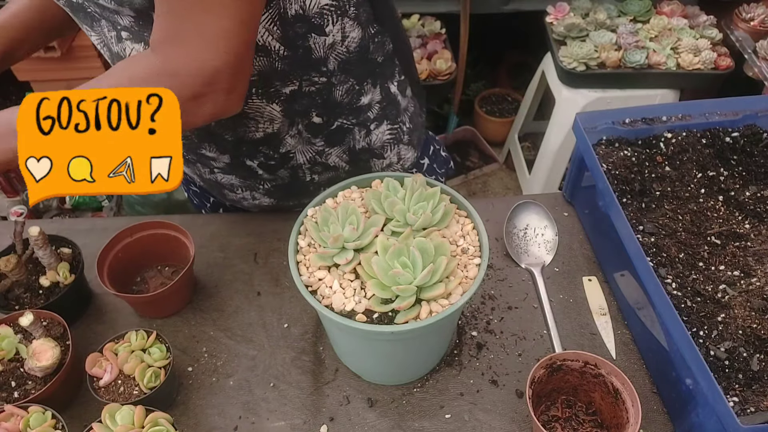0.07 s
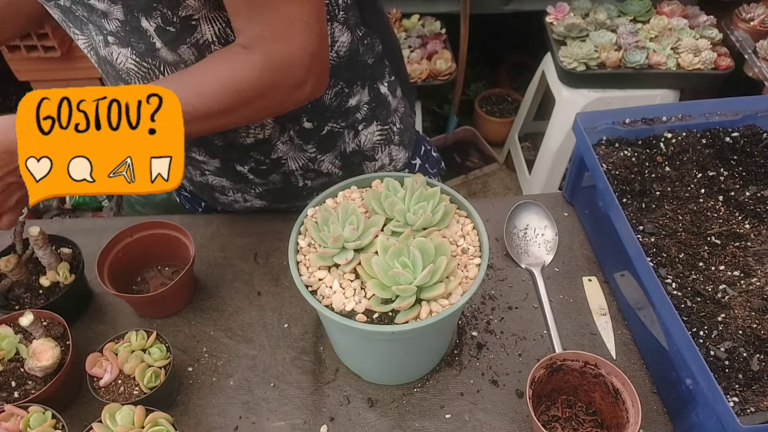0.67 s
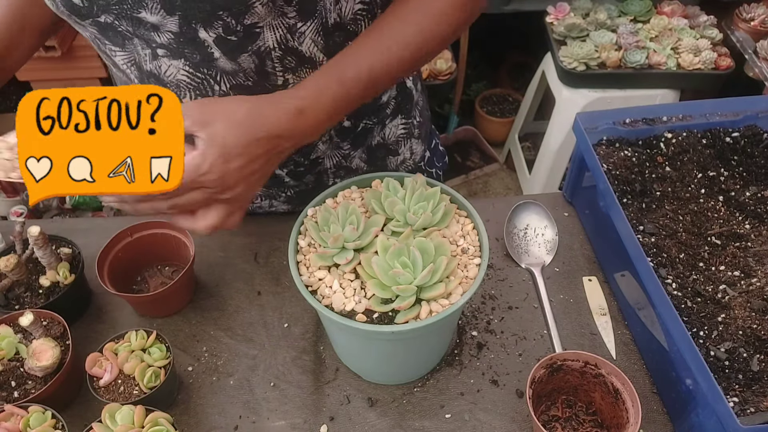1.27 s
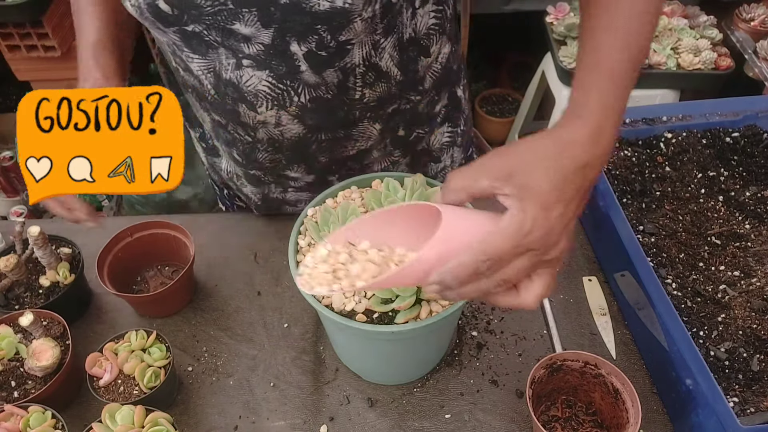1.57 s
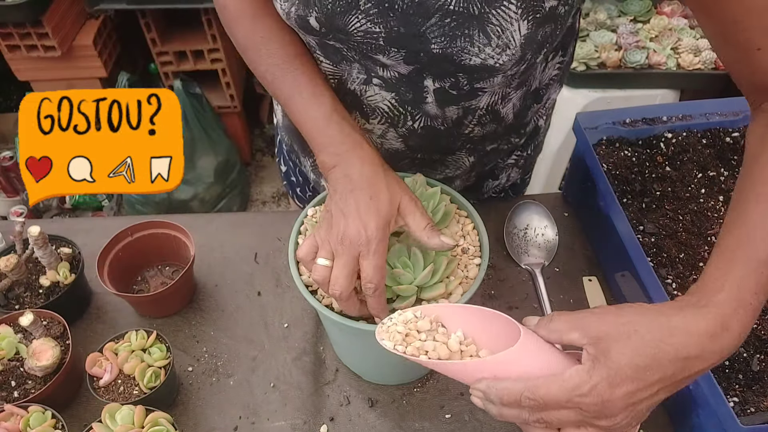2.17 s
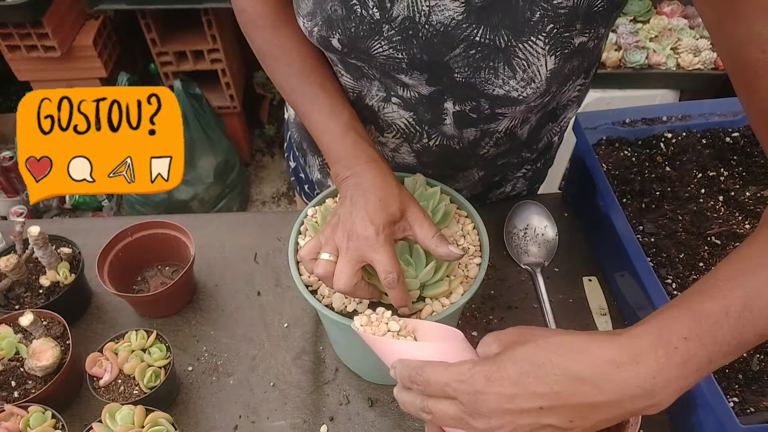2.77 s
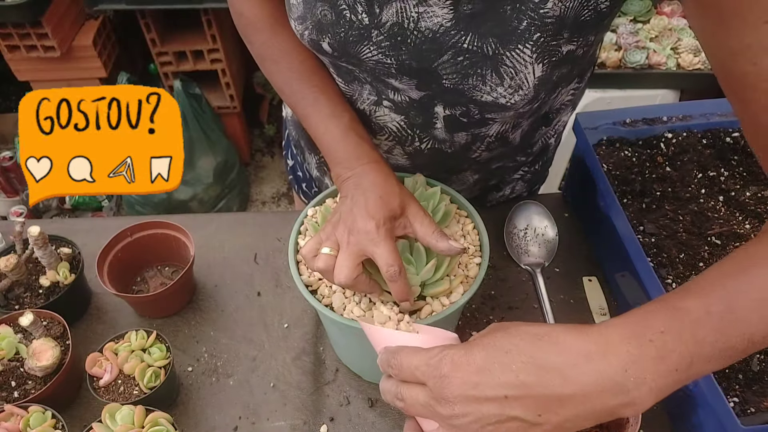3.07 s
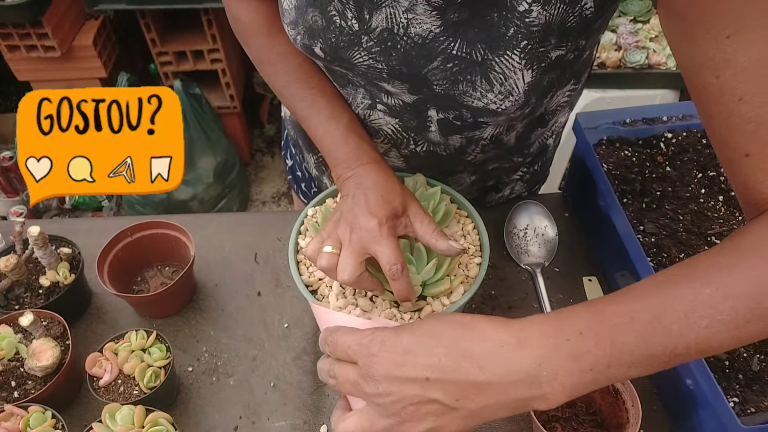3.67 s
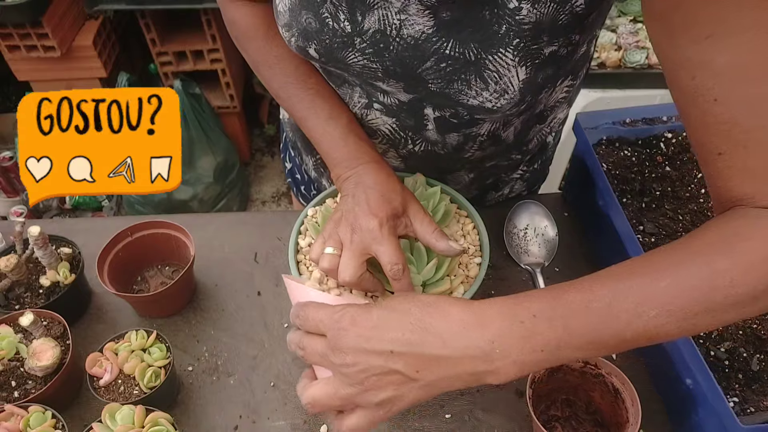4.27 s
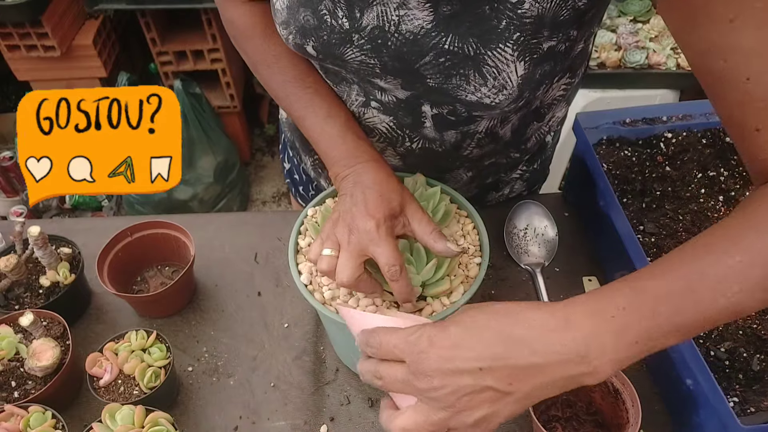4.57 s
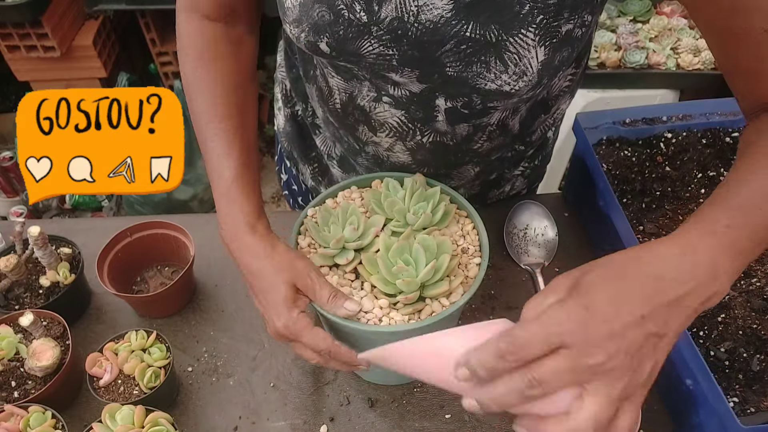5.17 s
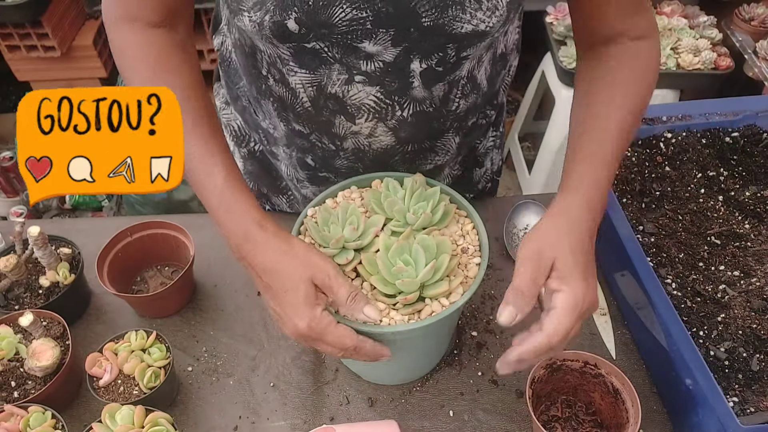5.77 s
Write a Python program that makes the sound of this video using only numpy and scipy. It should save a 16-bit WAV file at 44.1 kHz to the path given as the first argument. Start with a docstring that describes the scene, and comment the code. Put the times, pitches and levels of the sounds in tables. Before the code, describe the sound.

A plastic scoop ploughs into a tub of small pebbles right at the start, with several loud, crunching shoves and sharp stone clicks. At about 0.9 seconds it bumps the tub wall with a dull thud. The pebbles settle in the lifted scoop and rattle lightly until about 1.8 seconds. After a lull, fingers brush very faintly against leaves around 2.3 seconds. From 2.6 to 5 seconds the pebbles slide over the scoop's lip and patter into a plastic plant pot, much softer than the digging, in uneven surges with scattered clicks, thinning at the end. From about 5.2 to 6 seconds fine grit scrapes faintly under the turning pot. At 5.7 seconds the scoop lands on the bench with a clear hollow knock and rocks briefly. Everything is close and in stereo, in a small work room with short reverberation and a faint low rumble.

```python
"""Pebbles around a succulent

A plastic scoop crunches into a tub of small pebbles, rattles across a potting bench and trickles them
into a plastic pot. The pot is turned on grit and the scoop is put down with a hollow knock. Swarms of
tiny contacts ring both the stones and the plastic under them. Close stereo microphone, small work room."""
import sys
import numpy as np
from scipy import signal
from scipy.io import wavfile
from scipy.ndimage import map_coordinates

SR = 44100
rng = np.random.default_rng(int(sys.argv[2]) if len(sys.argv) > 2 else 0)


def wav_out(sig):
    """Save sig, one row per channel (or a flat mono array), as 16-bit PCM at SR to the path in sys.argv[1]."""
    wavfile.write(sys.argv[1], SR, np.round(np.clip(np.atleast_2d(sig).T, -1, 1) * 32767).astype(np.int16))


N = 265393
TIME = np.arange(N) / SR


def amp(db):
    """Decibels to gain."""
    return 10 ** (np.asarray(db) / 20)


def unit_rms(x):
    """Scales to rms 1."""
    return x / np.sqrt(np.mean(x ** 2) + 1e-20)


def curve_at(points, hz):
    """Reads a curve on a log-frequency axis."""
    freqs, values = np.transpose(points)
    return np.interp(np.log(hz + 1), np.log(freqs + 1), values)


def add(mix, start_s, sound):
    """Mixes a sound into both channels."""
    part = mix[:, max(round(start_s * SR), 0):][:, :sound.shape[-1]]
    part += sound[..., :part.shape[1]]


def butter(x, hz, kind, order=2):
    """Low-pass or high-pass."""
    return signal.sosfilt(signal.butter(order, min(hz, .49 * SR), kind, fs=SR, output="sos"), x)


def eq(x, spectrum, amount=1):
    """Minimum-phase EQ, so that clicks keep their attack."""
    hz = abs(np.fft.fftfreq(4096, 1 / SR))
    log_gain = np.log(amp(amount * curve_at(spectrum, hz)))
    taps = np.fft.ifft(np.exp(np.conj(signal.hilbert(log_gain)))).real
    return signal.oaconvolve(x, taps[:len(taps) // 2])[:len(x)]


def resonate(x, modes, shift=1):
    """A bank of resonances that may glide together by the factor shift."""
    out = 0
    for hz, width, db in modes:
        carrier = np.exp(2j * np.pi * np.cumsum(hz * shift * np.ones(N)) / SR)
        pole = np.exp(-np.pi * width / SR)
        envelope = signal.lfilter([1 - pole], [1, -pole], x * carrier.conj() + 1e-18)
        out = out + 2 * amp(db) * (carrier * envelope).real
    return out


def struck(modes):
    """Free ring of a struck body; neighbouring modes start in opposite directions."""
    t = np.arange(SR // 2) / SR
    return sum((-1) ** k * amp(db - 60 * t / t60) * np.sin(2 * np.pi * hz * t)
               for k, (hz, db, t60) in enumerate(modes))


def snap(hz, decay_s, cycles, crack_db):
    """A hard contact, rms 1 in its first 3 ms: a short ping, and a crack that differs in each channel."""
    t = np.arange(SR // 20) / SR
    ping = np.sin(2 * np.pi * hz * t) * np.exp(-t * hz / cycles)
    noise = unit_rms(butter(rng.standard_normal((2, len(t))), 3 * hz + 1500, "low", order=1))
    crack = amp(crack_db) * noise * np.exp(-t / decay_s)
    sound = butter(ping + crack, hz / 2, "high")  # small stones radiate little below their pitch
    return sound / np.sqrt(np.mean(sound[:, :round(.003 * SR)] ** 2, axis=1, keepdims=True))


def stroke(start_s, rise_s, hold_s, release_s):
    """Envelope of one hand movement: it builds up, holds and dies away."""
    since = TIME - start_s
    build_up = np.clip(since / rise_s, 0, 1) ** 1.6  # a moving heap gathers pebbles
    return build_up * np.exp(-np.maximum(since - rise_s - hold_s, 0) / release_s)


def strokes(rows, release_s):
    """Movements add in power; gives envelopes for the stones and for the plastic they ring."""
    gains = [np.outer(amp([db, db + ring_db]), stroke(start, rise, hold, release_s))
             for start, rise, hold, db, ring_db in rows]
    return np.linalg.norm(gains, axis=0)


def contacts(envelope, density, spread_db, clump_db=2.5):
    """Random pebble contacts in small avalanches; they crowd together when the heap moves faster."""
    per_s = density * (.25 + np.sqrt(envelope / envelope.max()))
    size = amp(spread_db * np.minimum(rng.exponential(1, N), 3.5)) * rng.choice([-1, 1], N)
    clumps = np.interp(TIME * 45, np.arange(1024), rng.standard_normal(1024))  # 45 values a second
    fires = rng.random(N) < per_s / SR
    return unit_rms(size * amp(clump_db * clumps) * fires / np.sqrt(per_s))


def stones(hits, spectrum, cycles, scatter_s, count=90):
    """Each contact rings one of many pebbles; every pebble has its own short scatter to each channel."""
    t = np.arange(256) / SR
    hz = rng.uniform(600, 16000, (count, 1))
    ping = np.exp(-t * hz / cycles) * np.sin(2 * np.pi * hz * t)
    ping /= np.linalg.norm(ping, axis=1, keepdims=True)
    scatter = rng.standard_normal((2, count, len(t))) * np.exp(-t / scatter_s)
    scatter /= np.linalg.norm(scatter, axis=2, keepdims=True)
    grains = ping + amp(3.5) * scatter
    out = np.zeros((2, N))
    onsets = np.flatnonzero(hits[:-len(t)])
    for start, pebble in zip(onsets, rng.integers(0, count, len(onsets))):
        out[:, start:start + len(t)] += hits[start] * grains[:, pebble]
    return unit_rms(np.array([eq(channel, spectrum) for channel in out]))


def hollow(hits, modes, low_cut_hz, shift=1):
    """Contacts drum on a thin surface, which radiates no deep bass; each favours one channel."""
    drive = hits * (1 + 0.26 * rng.standard_normal((2, N)))
    ring = butter(resonate(drive, modes, shift), low_cut_hz, "high", order=4)
    return unit_rms(butter(ring, 2 * modes[-1][0], "low"))


# Spectrum of the room at rest: (frequency [Hz], level [dB])
ROOM_TONE_EQ = [(20, -24), (50, 4.5), (80, 2), (130, -4.5), (200, -14), (350, -13.5), (700, -29.5),
                (1500, -33), (4000, -42), (9000, -41), (16000, -38.5)]

def room_tone():
    """Low rumble, stronger on the right, under a faint hiss."""
    shared, left, right = (unit_rms(eq(noise, ROOM_TONE_EQ)) for noise in rng.standard_normal((3, N)))
    quiet_side = eq(shared + 0.65 * left, [(100, -13.5), (250, -7), (700, -2.5), (2000, -4)])
    return amp(-59) * np.array([quiet_side, shared + right])


# Reverb time of the work room: (frequency [Hz], T60 [s])
ROOM_DECAY = [(150, 0.63), (1500, 0.24), (4000, 0.27), (15000, 0.27)]

def reverb(x, predelay_s, low_cut_hz):
    """Sparse reflections, different in each channel, dying band by band."""
    shape = (2, SR // 2)
    taps = rng.choice([-1., 1.], shape) * (rng.random(shape) < 0.1)
    taps *= np.arange(shape[1]) > predelay_s * SR
    hz, t, bands = signal.stft(taps, SR, nperseg=128)
    tail = signal.istft(bands * amp(-60 * t / curve_at(ROOM_DECAY, hz)[:, None]), SR)[1]
    tail /= np.linalg.norm(tail, axis=1, keepdims=True)
    return signal.oaconvolve(x, butter(tail, low_cut_hz, "high"), axes=1)[:, :N]


# Fingers slip past the leaves as the pebbles start to creep in the scoop
REACH = dict(start_s=2.18, rise_s=.11, hold_s=.19, release_s=.12)

def leaf_rub():
    """Soft, narrow hiss of skin on waxy leaves."""
    hiss = hollow(rng.standard_normal((2, N)), [(4200, 650, 0)], low_cut_hz=3020)
    return amp(-64.5) * stroke(**REACH) * hiss


# Pebbles hit the scoop's shell: (time [s], gain [dB])
SHELL_HITS = [(.046, -22), (.803, -15), (0.81, -19), (1.655, -42), (4.209, -40), (4.239, -37), (4.297, -38),
              (4.781, -42)]
# Ring of the held scoop: (frequency [Hz], level [dB], T60 [s])
HELD_SCOOP_MODES = [(963, 0, 0.028), (1270, -9, 0.012), (2140, -11, 0.031)]

def shell_taps():
    """Tumbling pebbles make small hollow knocks inside the scoop."""
    out = np.zeros((2, N))
    ring = butter(struck(HELD_SCOOP_MODES), 650, "high")
    for time_s, db in SHELL_HITS:
        add(out, time_s, amp(db) * ring)
    return out


# The scoop hits the tub: (time [s], gain [dB])
TUB_HITS = [(0.058, -15), (0.208, -12), (0.651, -20.5), (0.789, -17.5), (0.9148, 0)]
# Thud of the tub wall: (frequency [Hz], level [dB], T60 [s])
TUB_WALL_MODES = [(114, -21.5, 0.053), (196, -26, 0.077), (272, -15, 0.048), (299, -22, 0.16)]

def tub_bumps():
    """Dull blows on the wall of the full tub, all modes starting in phase."""
    out = np.zeros((2, N))
    ring = sum(struck([mode]) for mode in TUB_WALL_MODES)
    thud = butter(butter(ring, 490, "low", order=3), 85, "high")
    for time_s, db in TUB_HITS:
        add(out, time_s - .001, amp(db) * thud)
    return out


# The scoop meets the bench: (time [s], body gain [dB], body low-pass [Hz], edge tick gain [dB])
BENCH_HITS = [(5.644, -14.5, 486, -36.5), (5.657, -25, 2000, -22.5), (5.6591, 0.5, 2490, -24.5),
              (5.73, -35, 501, -39), (5.74, -15.5, 484, -56.5), (5.746, -14, 560, -45),
              (5.795, -28, 240, -66)]
# Body of the scoop on the bench: (frequency [Hz], level [dB], T60 [s])
BENCH_SCOOP_MODES = [(106, -19.5, 0.096), (146.7, -16, 0.1), (274, -19.5, 0.066), (367, -21, 0.056),
                     (567, -21.5, 0.03), (667, -24.5, 0.027), (1005, -10, 0.034), (1252, -13, 0.03),
                     (1425, -12, 0.03), (1616, -10, 0.02), (1903, -12.5, 0.029), (2110, -13, 0.032),
                     (2550, -20.5, 0.035)]

def scoop_set_down():
    """The scoop touches, lands with a brief chatter and rocks; soft contacts ring only its low modes."""
    out = np.zeros((2, N))
    ring = butter(struck(BENCH_SCOOP_MODES), 60, "high")
    t = np.arange(len(ring)) / SR
    noise = rng.standard_normal((2, len(t)))
    chatter = unit_rms(butter(butter(noise, 680, "high"), 1800, "low", order=4))
    body = ring + amp(-20.5 - 60 * t / 0.11) * chatter
    for time_s, db, bright_hz, tick_db in BENCH_HITS:
        add(out, time_s, amp(db) * butter(body, bright_hz, "low", order=5))
        add(out, time_s, amp(tick_db - 12.5) * snap(3000, decay_s=.0065, cycles=2.1, crack_db=-7))
    return out


# Pebble accents: (time [s], gain [dB], pitch [Hz], low tap relative to the gain [dB])
PEBBLE_ACCENTS = [(.1877, -23.5, 2470, -22), (.2041, -22.5, 2770, -4), (0.3464, -33, 1830, 3),
                  (.5869, -27, 2165, -9), (0.595, -24, 2580, -8), (.6058, -16.5, 2220, -10),
                  (.6318, -18.5, 6960, -1), (.6528, -16.5, 1960, .5), (.687, -19, 2405, -2.5),
                  (.7077, -17.5, 1992, -0.5), (.7528, -25, 1767, 3), (.7906, -17, 2010, 4.5),
                  (.8468, -32, 1540, 5), (.9154, -27, 4670, 2), (1.1142, -22.5, 11800, -13),
                  (1.2737, -35.5, 2795, -1), (1.4096, -38.5, 2460, -16), (1.5606, -30.5, 4650, -23),
                  (1.5974, -27, 2460, -24), (1.6117, -31.5, 4700, -22), (1.632, -33.5, 2290, -26),
                  (2.1039, -57.5, 7530, -3.5), (2.583, -37.5, 1960, -30.5), (2.96, -33.5, 3820, -7),
                  (3.0106, -33.5, 2130, -18), (3.1893, -32, 4600, -13), (3.2021, -37, 2020, -12),
                  (3.245, -42, 1480, -5), (3.2675, -43.5, 7190, -9), (3.3789, -45, 4325, -16),
                  (3.7631, -39, 2190, -7.5), (3.8918, -44.5, 2395, -9), (4.24, -46, 1257, -10),
                  (4.2983, -44.5, 1150, 2), (4.4497, -36.5, 5050, 1), (4.4717, -35, 11660, -1.5),
                  (4.6445, -40.5, 6460, -10), (4.6834, -48.5, 7600, -3), (4.75, -37, 4770, -3),
                  (4.7819, -35.5, 3704, 6), (5.2165, -50, 2845, -9)]

def pebble_clicks():
    """Single loud pebbles, each with a low tap from the plastic under it."""
    out = np.zeros((2, N))
    tap = butter(struck([(328, -7, .019), (540, 3.5, .013)]), 220, "high")
    for time_s, db, hz, tap_db in PEBBLE_ACCENTS:
        decay_s = .0016 * amp(db + 30) ** 0.15  # harder hits crack longer
        crack_db = -5 + 0.3 * tap_db  # stone on plastic cracks; stone on stone rings cleaner
        add(out, time_s, amp(db + 1) * snap(hz, decay_s, cycles=2.2, crack_db=crack_db))
        add(out, time_s, amp(db + tap_db) * tap)
    return out


# Bright ring of the scoop's wall: (frequency [Hz], bandwidth [Hz], gain [dB])
WALL_RESONANCES = [(2252, 130, 0), (3140, 280, -3.5), (4070, 120, -4.5), (5670, 160, -9.5),
                   (7830, 350, -4.5)]

def against_wall(grains, ring_db):
    """Stones rubbing on plastic pick up its resonances."""
    return unit_rms(grains + amp(ring_db) * resonate(grains, WALL_RESONANCES))


# Tone of the loose load: (frequency [Hz], gain [dB])
SETTLE_EQ = [(150, -16), (320, 6), (420, -2.5), (540, 5), (800, -1.5), (1500, 3), (2300, -0.5), (3200, 0.5),
             (4500, -7.5), (7000, -13.5), (10000, -15.5), (16000, -17)]

def settling():
    """Loose pebbles find their places in the lifted scoop."""
    settle = amp(-44) * stroke(start_s=.88, rise_s=.054, hold_s=.44, release_s=.04)
    hits = contacts(settle, density=1800, spread_db=3.5, clump_db=2)
    return settle * against_wall(stones(hits, SETTLE_EQ, cycles=3.04, scatter_s=.0018), ring_db=-3)


# Swings of the full scoop: (start [s], rise [s], hold [s], rattle gain [dB], scoop ring offset [dB])
SWINGS = [(1.35, .05, 0.3, -52, 0), (1.52, 0.056, 0.045, -44, -2.5), (1.78, .05, 0.084, -70, -16)]
# Tone of the rattle: (frequency [Hz], gain [dB])
RATTLE_EQ = [(200, -13), (700, -8), (1500, -3.5), (2300, -4), (3200, -2.5), (4500, -0.5), (6000, -5),
             (8300, -10.5), (10000, -9.5), (16000, -12)]
# Body of the loaded scoop: (frequency [Hz], bandwidth [Hz], gain [dB])
SCOOP_RESONANCES = [(965, 74, 6.5), (1890, 230, -6), (2040, 180, 2), (2655, 260, -17)]

def carrying():
    """Pebbles shift and rattle in the scoop on its way to the pot."""
    rattle, ring = strokes(SWINGS, release_s=.047)
    hits = contacts(rattle, density=2800, spread_db=3.5)
    grains = against_wall(stones(hits, RATTLE_EQ, cycles=5.4, scatter_s=.0015), ring_db=0)
    body = hollow(hits, SCOOP_RESONANCES, low_cut_hz=690)
    return amp(3) * rattle * grains + amp(1) * ring * body


# Pushes that turn the pot: (start [s], rise [s], hold [s], scrape gain [dB], pot ring offset [dB])
PUSHES = [(5.15, .025, 0.053, -61, -4), (5.21, 0.095, 0.16, -60, -8), (5.34, .05, 0.016, -70.5, 14),
          (5.5, 0.027, .025, -66, -9), (5.71, .03, .04, -62, -19), (5.82, .06, 0.068, -62, -23.5),
          (5.985, 0.024, .02, -58.5, -22)]
# Tone of sliding grit, shared with the pour: (frequency [Hz], gain [dB])
SLIDE_EQ = [(200, -44), (800, -3), (1500, -4.5), (2200, 0.5), (3000, 1), (4100, 0.5), (5000, 0.5),
            (6500, -2), (8400, -5), (9800, -11), (12500, -5), (16000, -11.5)]
# Body of the pot, shared with the pour: (frequency [Hz], bandwidth [Hz], gain [dB])
POT_RESONANCES = [(450, 240, 5), (625, 180, 0.5), (930, 50, -1)]

def pot_turning():
    """Fine grit scrapes under the pot; between pushes the hand keeps leaning on it."""
    push, ring = strokes(PUSHES, release_s=.02)
    lean = amp(-72) * stroke(start_s=5.15, rise_s=.027, hold_s=.85, release_s=.05)
    scrape = np.hypot(push, lean)
    hits = contacts(scrape, density=2300, spread_db=1)
    grit = stones(hits, SLIDE_EQ, cycles=3.1, scatter_s=.0023)
    body = hollow(hits, POT_RESONANCES, low_cut_hz=220)
    return amp(4) * scrape * grit + amp(1) * ring * body


# One surge per tip of the scoop: (start [s], rise [s], hold [s], slide gain [dB], patter offset [dB])
SURGES = [(2.74, .06, 0.085, -46, -17), (2.87, 0.074, .17, -42.5, -10.5), (3.15, .04, 0.03, -44.5, -10),
          (3.54, .12, .095, -42, -8), (3.9, .12, .085, -42.5, -7.5), (4.18, .035, 0.097, -50, -4.5),
          (4.26, .15, .07, -40, -7.5), (4.46, .035, .06, -50, -1.5), (4.63, .015, 0.049, -50.5, -6.5),
          (4.73, 0.018, 0.049, -45.5, -6), (4.88, 0.018, 0.0082, -57, 2),
          (4.925, 0.022, 0.024, -59.5, -3.5)]
# Ring of the scoop's lip: (frequency [Hz], bandwidth [Hz], gain [dB])
LIP_RESONANCES = [(1338, 240, 0.79), (1574, 180, -2.8)]

def pouring():
    """Pebbles creep, then slide over the lip and patter into the pot, trickling on between surges."""
    creep = stroke(**REACH)
    surge, patter = strokes(SURGES, release_s=.026)
    trickle = stroke(start_s=2.58, rise_s=.06, hold_s=1.97, release_s=.0488)
    trickle *= amp(-2 * (TIME - 2.58))  # thins by 2 dB a second as the scoop empties
    slide = np.hypot(surge, amp(-52.5) * trickle) + amp(-68) * creep
    lip = np.hypot(amp(-6) * surge, amp(-58.5) * trickle) + amp(-71.5) * creep
    pot = np.hypot(patter, amp(-69) * trickle)
    hits = contacts(slide, density=3800, spread_db=3.5, clump_db=2.2)
    lip_ring = hollow(hits, LIP_RESONANCES, low_cut_hz=1060)
    pot_ring = hollow(hits, POT_RESONANCES, low_cut_hz=258)
    grains = against_wall(stones(hits, SLIDE_EQ, cycles=3, scatter_s=.0027), ring_db=-8)
    return amp(0.67) * slide * grains + lip * lip_ring + pot * pot_ring


# Shoves, then levelling shakes: (start [s], rise [s], hold [s], crunch gain [dB], tub ring offset [dB])
SHOVES = [(-.02, 0.045, .04, -24.5, -4.5), (.15, .045, .015, -23, -10), (.235, 0.056, .012, -26, -10),
          (.41, .025, 0.028, -32, 5.5), (.46, .07, 0.076, -27, -16), (.62, 0.029, 0.088, -36, 0),
          (.782, .01, .012, -27, -5), (1.095, 0.014, .01, -41, -7), (1.16, 0.019, .015, -41.5, -13.5),
          (1.255, .015, .015, -45, -3)]
# Tone of the crunch: (frequency [Hz], gain [dB])
CRUNCH_EQ = [(150, -15), (400, 2.5), (750, -7), (1100, -0.5), (1500, 2.5), (1850, 2.5), (2300, -0.5),
             (3200, -3), (4500, -3), (5700, -2.5), (7200, -8.5), (8400, -9.5), (10000, -8), (16000, -12.5)]
# Hollow body of the dig: (base frequency [Hz], bandwidth [Hz], gain [dB])
TUB_RESONANCES = [(312, 20, 2.5), (341, 46, 5.5), (435, 37, -2.5), (564, 100, -5.5)]
# That body glides as the scoop fills and its hollow shrinks: (time [s], frequency factor [ratio])
FILL_GLIDE = [(0, 0.92), (.08, 0.79), (.22, 0.88), (.3, 0.94), (.5, 1.03), (.62, 1.06), (.8, 1),
              (.92, 0.93), (1.42, 0.95)]

def digging():
    """The scoop ploughs through the tub in shoves; under them it drags ever deeper, then lifts out."""
    shove, shove_ring = strokes(SHOVES, release_s=.023)
    drag = amp(-31.5) * stroke(start_s=-.2, rise_s=.5, hold_s=.49, release_s=.09)
    crunch = np.hypot(shove, drag)
    ring = np.hypot(shove_ring, amp(-6) * drag)
    hits = contacts(crunch, density=4200, spread_db=4, clump_db=1.9)
    grains = against_wall(stones(hits, CRUNCH_EQ, cycles=2.3, scatter_s=.0016), ring_db=1)
    glide = np.interp(TIME, *np.transpose(FILL_GLIDE))
    body = hollow(hits, TUB_RESONANCES, low_cut_hz=214, shift=glide)
    return amp(1) * crunch * grains + amp(-1) * ring * body


def delay_pan(x, lag_ms):
    """The sound reaches the left side of the microphone first."""
    right = map_coordinates(x[1], [np.arange(N) - lag_ms * SR / 1000], order=5)
    return np.array([x[0], right])


# Pan of the pebbles from tub to pot: (time [s], right channel lag [ms])
PEBBLE_PAN = [(0, 0.35), (1.2, 0.35), (1.6, .1), (2.2, 0.099), (6.02, 0.11)]

def scene():
    """Close pebbles and knocks, with a short room reverb, over room tone."""
    pebbles = digging() + settling() + carrying() + leaf_rub() + pouring() + pot_turning()
    pebbles += pebble_clicks() + shell_taps() + tub_bumps()
    knocks = scoop_set_down()
    lag_ms = np.interp(TIME, *np.transpose(PEBBLE_PAN))
    direct = delay_pan(pebbles, lag_ms) + delay_pan(knocks, lag_ms=0.097)
    send = amp(-12) * pebbles + amp(-14.5) * knocks
    return direct + reverb(send, predelay_s=.004, low_cut_hz=203) + room_tone()


# Microphone colour, scaled in opposite directions for left and right: (frequency [Hz], gain [dB])
STEREO_EQ = [(60, -0.5), (150, 3.5), (280, 1.5), (800, 1), (1500, 1.5), (2400, -0.5), (3200, -2.5),
             (4100, 4), (5300, 1.5), (7200, 4), (8600, 7.5), (9400, -7), (12000, -1.5), (16000, -1)]

def record(dry):
    """Each channel gets its own colour, then a steep low-pass trims the very top."""
    pair = np.array([eq(dry[0], STEREO_EQ, amount=-0.24), eq(dry[1], STEREO_EQ, amount=0.72)])
    low_pass = signal.firwin(511, 15950, window=("kaiser", 8), fs=SR)
    return signal.oaconvolve(pair, low_pass[None], "same")


dry = scene()
out = record(dry)
wav_out(out)
```